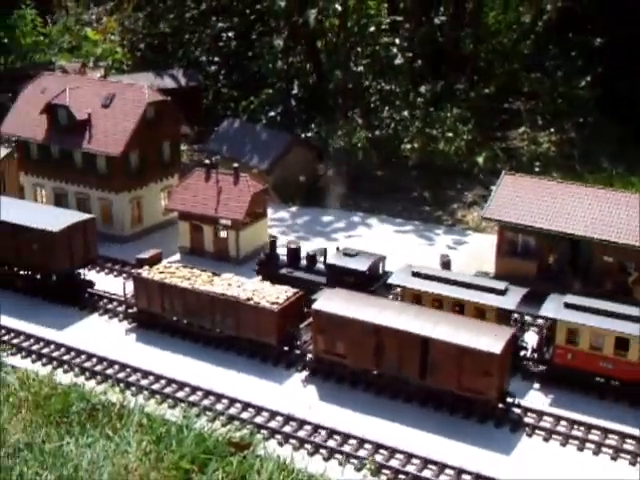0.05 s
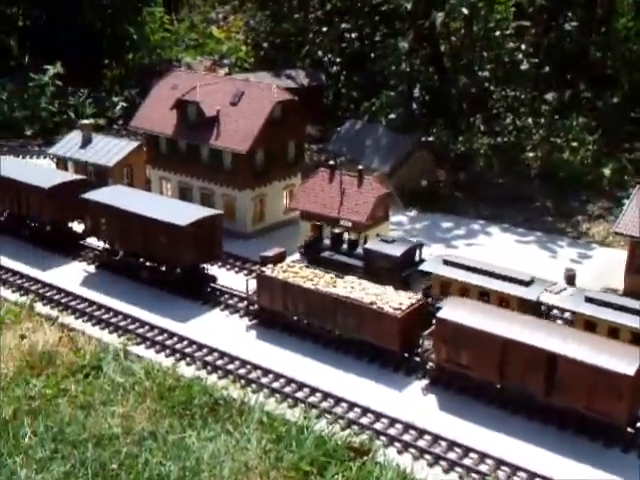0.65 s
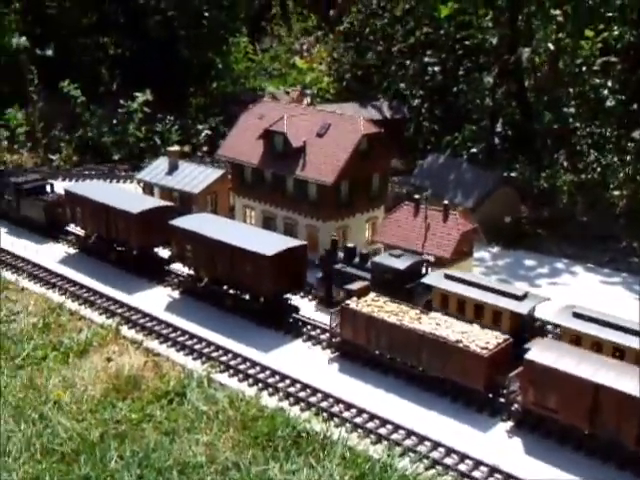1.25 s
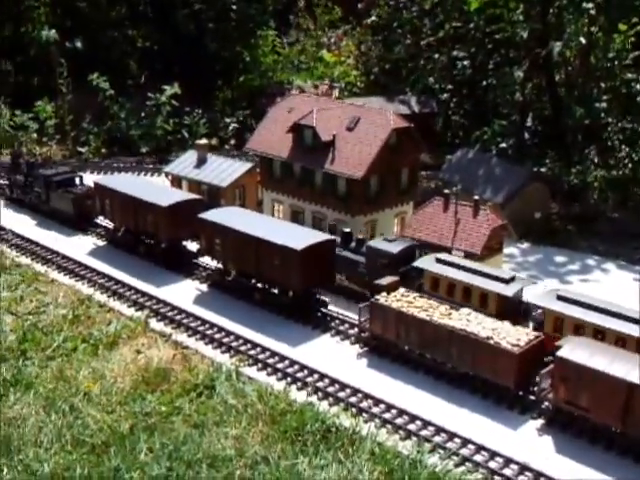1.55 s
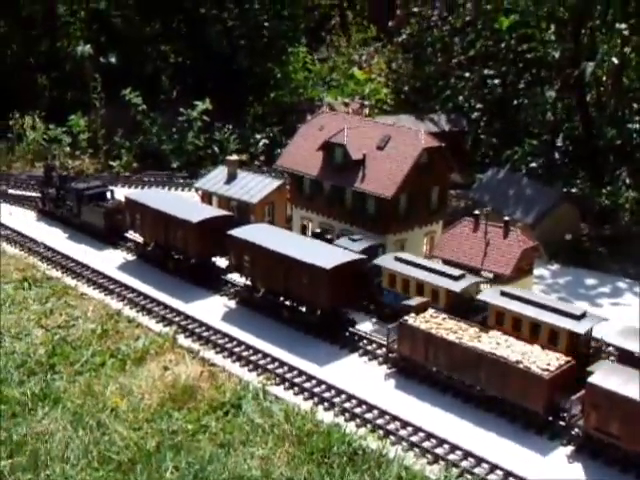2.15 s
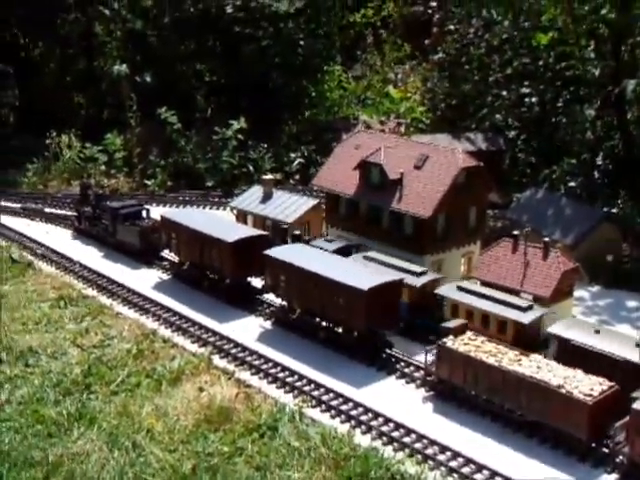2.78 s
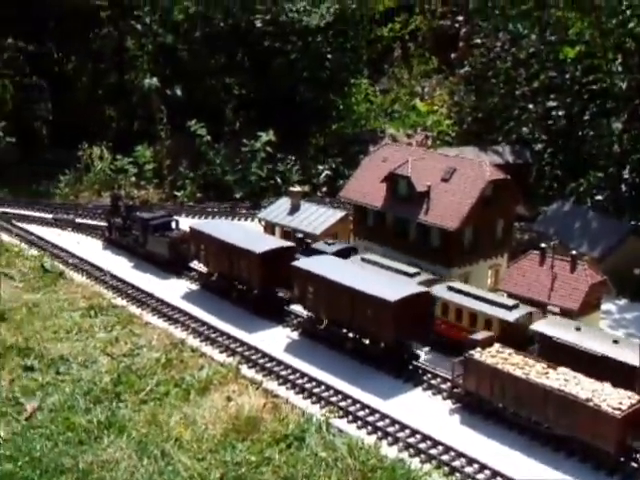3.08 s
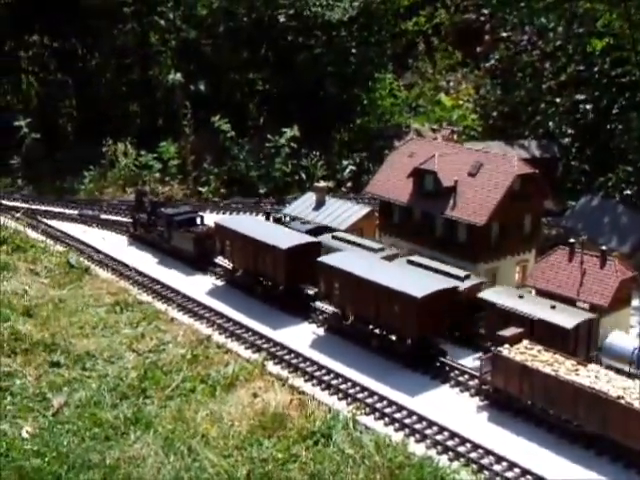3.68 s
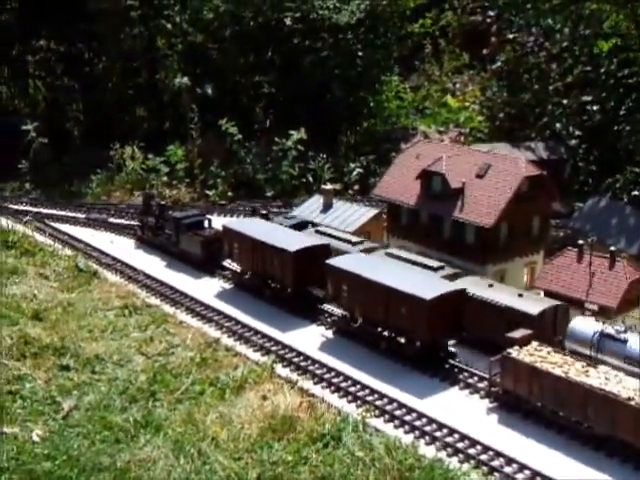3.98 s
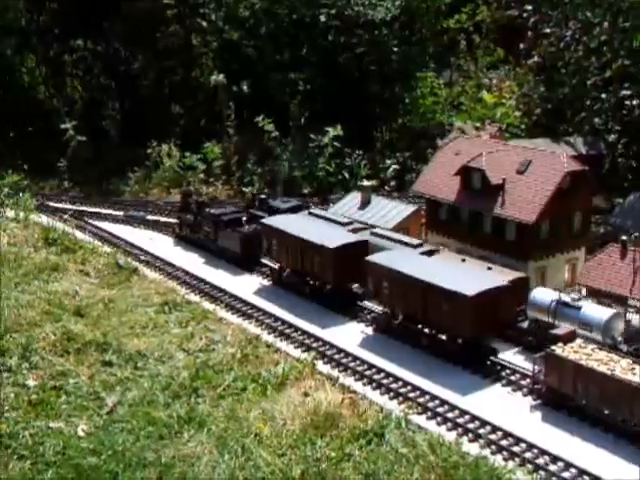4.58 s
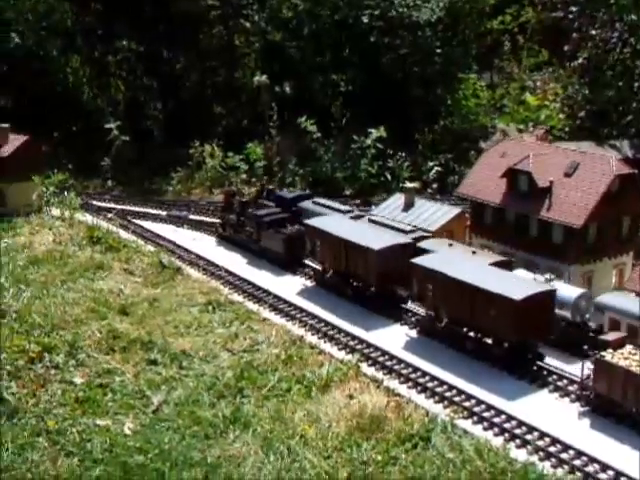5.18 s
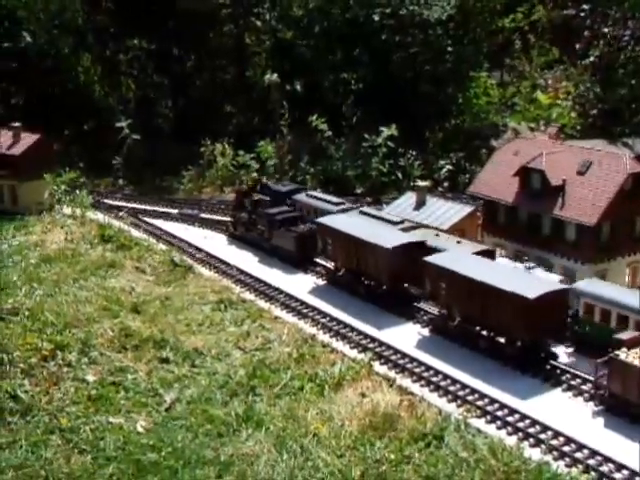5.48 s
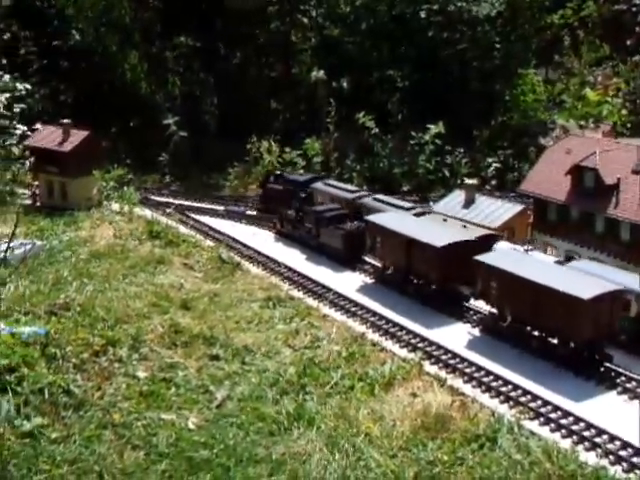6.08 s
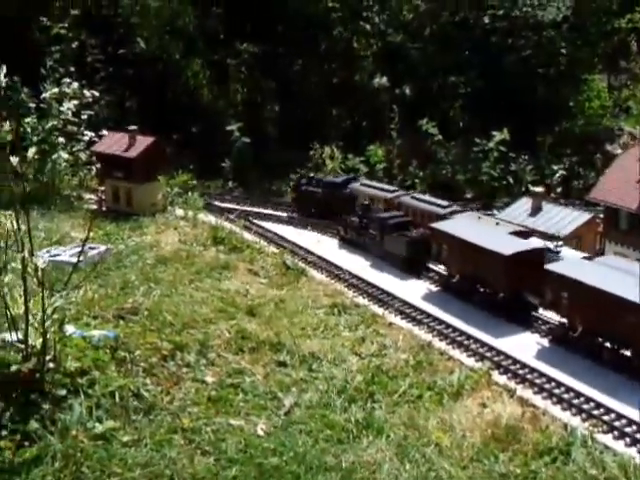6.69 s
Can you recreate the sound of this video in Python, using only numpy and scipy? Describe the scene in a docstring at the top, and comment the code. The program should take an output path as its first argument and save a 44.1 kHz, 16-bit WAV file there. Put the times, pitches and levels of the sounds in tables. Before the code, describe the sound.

Birds chirp briefly as a miniature steam train puffs and rolls away, sounding a piercing, sputtering whistle once long and twice short.

```python
"""Songbirds chirp in the hedge over the chuffing of a small live-steam garden locomotive.
Each piston stroke puffs wet steam up the chimney, and the wagons rumble and clack as they draw away.
The whistle spits water, then a steam jet sounds its pipe: one long, fluttering blast and a double toot
echo round the garden. Automatic gain control ducks everything else under the whistle."""
import sys
import numpy as np
from scipy import signal
from scipy.fft import rfft, irfft, next_fast_len
from scipy.io import wavfile
from scipy.ndimage import uniform_filter1d, minimum_filter1d, map_coordinates

SR = 44100
rng = np.random.default_rng(int(sys.argv[2]) if len(sys.argv) > 2 else 0)


def wav_out(sig):
    """Save sig, one row per channel (or a flat mono array), as 16-bit PCM at SR to the path in sys.argv[1]."""
    wavfile.write(sys.argv[1], SR, np.round(np.clip(np.atleast_2d(sig).T, -1, 1) * 32767).astype(np.int16))


N = 301644
TIME = np.arange(N) / SR

# Levels are relative; a spread is the standard deviation of a bell-shaped swell.
# distant outdoor bed: f/Hz, level/dB
FAR_SPECTRUM = [(50, -17.5), (110, -7.5), (190, -2), (300, -9), (500, -14.5), (1500, -15), (4000, -37.5)]
# low rumble of air: f/Hz, level/dB
AIR_SPECTRUM = [(15, 15.5), (30, -9.5), (65, 0), (110, -11.5), (300, -28), (1500, -81)]
# one puff of air on the microphone: t/s, level/dB, spread/s
GUST = (2.38, -34.5, 0.031)
# garden reverb: f/Hz, time to fall 60 dB/s
GARDEN_DECAY = [(300, 0.44), (2000, 0.8), (5000, 0.54), (9000, 0.27)]
# birdsong: t/s, length/s, start f/Hz, end f/Hz, level/dB, opening trill/share of pitch
BIRD_NOTES = [(-.03, 0.056, 3450, 3450, -33.5, 0.028), (-.02, 0.089, 1677, 1622, -47, 0.017),
              (0.043, .032, 4900, 4350, -30, 0), (0.069, 0.087, 3400, 2862, -24.5, 0.095),
              (.09, 0.075, 1770, 1868, -39.5, 0.1), (.235, 0.057, 1913, 1822, -35, 0),
              (0.275, 0.077, 3490, 3187, -21.5, 0.014), (0.382, 0.039, 2634, 2750, -27, 0.015),
              (.4, 0.063, 1867, 1825, -37.5, 0), (.408, 0.044, 2680, 2534, -27.5, 0.06),
              (1.923, 0.075, 1970, 2017, -55, 0.034), (2.105, 0.048, 2388, 2413, -46.5, 0),
              (6.193, 0.068, 2890, 3110, -43, 0.09), (6.308, 0.065, 4600, 5450, -51.5, .03),
              (6.548, 0.034, 5050, 4580, -41.5, 0), (6.583, 0.06, 3080, 3020, -48, 0.044),
              (6.783, 0.033, 5030, 6100, -40, 0.018)]
# the train draws away: t/s, rolling level/dB, leak level/dB, exhaust level/dB
TRAIN_FADES = [(0.2, -35.5, -43, -29), (1.0, -38.5, -44, -30), (1.5, -36.5, -44.5, -30),
               (2.5, -38.5, -45, -29), (3.4, -38, -45, -34), (4.9, -48, -51.5, -46),
               (5.2, -42.5, -51, -41.5), (6.0, -48, -53, -46.5), (6.8, -45, -50.5, -39.5)]
# wheels on rails: f/Hz, level/dB
ROLLING_SPECTRUM = [(65, -50.5), (110, -27.5), (237, -5.5), (301, -6), (538, -6.5), (790, 3.5), (1040, -23),
                    (1240, -5), (1430, -17), (1790, -9), (2600, -15.5), (3380, -40.5), (5720, -120)]
# wagon bodies and track: f/Hz, width/Hz, level/dB
WAGON_MODES = [(812, 79, 2), (1276, 70, -5), (1870, 320, -15)]
# leaking steam: f/Hz, level/dB
LEAK_SPECTRUM = [(1500, -19.5), (2800, -10), (3700, -3.5), (5000, -2), (5800, -7), (6800, -6.5),
                 (7400, -5.5), (7900, -8)]
# couplings snap taut: t/s, level/dB, spread/s
CLACKS = [(0.527, -36, 0.012), (0.619, -21, 0.0026)]
# colour of a clack: f/Hz, level/dB
COUPLING_SPECTRUM = [(300, -32), (800, -14), (1150, -2), (1700, -5), (2200, 1), (2800, -15), (3500, -11.5),
                     (4500, -15), (8000, -41)]
# flanges touch the rail: t/s, level/dB, spread/s
SCRAPES = [(.524, -32.5, 0.0082), (.965, -37.5, 0.024), (1.455, -38, 0.028)]
# colour of a scrape: f/Hz, level/dB
FLANGE_SPECTRUM = [(1500, -21), (2400, -9), (3300, -5), (4300, 3), (5500, -12), (8000, -17)]
# the driving wheels run evenly, quicken a little, then slow: t/s, rotation/turns
WHEEL_TURNS = [(-.016, 0), (2.405, 7), (2.745, 8), (3.397, 10), (5.006, 15), (5.689, 17), (6.05, 18),
               (6.483, 19), (6.968, 20)]
# four uneven exhaust beats to a wheel turn: position/turns, level/dB
BEATS = [(0, -3), (.253, -2.5), (.473, 0.5), (.693, -2)]
# water spat from the chimney: t/s, level/dB
CHIMNEY_DROPS = [(0.833, -27), (1.178, -27), (2.222, -33)]
# smokebox and chimney: f/Hz, width/Hz, level/dB
CHIMNEY_MODES = [(3370, 580, -14.5), (4034, 110, -3.5), (4490, 160, -0.5), (4846, 120, -3),
                 (5160, 390, -11.5), (5935, 120, -9), (6340, 180, -12.5), (7380, 150, -14.5)]
# spurts of water as the whistle valve first opens: t/s, level/dB, spread/s
SPURTS = [(3.514, -21, 0.0072), (3.529, -17.5, .005), (3.541, -10, 0.005), (3.557, -14, 0.0057)]
# the water-filled whistle: f/Hz, width/Hz, level/dB
FLOODED_MODES = [(1380, 240, -8), (1840, 270, -3), (4155, 680, 0), (4720, 410, 8), (5600, 520, -5.5),
                 (5830, 590, -11), (7590, 170, 1)]
# the pipe empties after the long blast: t/s, level/dB, spread/s
GULP = (4.682, -26.5, 0.008)
# the cab rings under a wet jet: f/Hz, width/Hz, level/dB
CAB_MODES = [(1577, 200, -5), (1790, 190, 1), (2050, 170, -11.5)]
# the pipe, stirred by steam at its lip: f/Hz, width/Hz, level/dB
PIPE_MODES = [(1530, 700, -17.5), (2550, 250, -13), (3540, 930, -9), (4510, 260, 3), (4880, 172, 12.5),
              (5520, 930, -3.5), (6240, 230, 0), (7650, 1800, -8)]
# water in the jet: t/s, relative amount
WETNESS = [(3.6, 0.81), (3.9, 0.91), (4.1, 1.67), (4.45, 1.7), (4.6, .9), (5.38, 0.95), (5.65, 0.55)]
# drops choke the tone: t/s, spread/s, depth/dB
CHOKES = [(3.656, .016, 6), (3.691, 0.0032, 21.5), (3.91, 0.0022, 22), (4.006, 0.0064, 9.5),
          (4.019, .006, 13.5), (4.062, 0.0084, 10), (4.411, 0.01, 7.5), (5.351, 0.021, 7),
          (5.379, 0.0051, 12.5)]
# whistle cues: open t/s, close t/s, f/Hz, scoop/Hz, scoop time/s,
# opening level/dB, closing level/dB, steam rush level/dB
BLASTS = [(3.558, 4.676, 4940, 202, 0.01837, 10, -2.5, -17),
          (5.275, 5.467, 4940, 300, 0.0087, 1.5, -2, -16.5),
          (5.606, 5.741, 4958, 1001, 0.0013, 1.5, -2, -18)]
# steep high cut on the mix: f/Hz, level/dB
HIGH_CUT = [(7650, 0), (7950, -9), (8250, -28), (8400, -50), (8700, -120)]


def amp(db):
    """Decibels to gain."""
    return 10 ** (np.asarray(db) / 20)


def unit(x):
    """x at rms 1."""
    return x / np.sqrt(np.mean(x ** 2) + 1e-20)


def along(points, hz):
    """Points (f/Hz, value) read on a log axis."""
    f, v = np.transpose(points)
    return np.interp(np.log(hz + 1), np.log(f + 1), v)


def curves(rows):
    """An automation curve for each column after the time."""
    times, *columns = np.transpose(rows)
    return [np.interp(TIME, times, column) for column in columns]


def wobble(rate):
    """A smooth random curve, rate knots a second."""
    return map_coordinates(rng.standard_normal(int(N * rate / SR) + 4), [TIME * rate])


def bump(s, spread):
    """A bell-shaped swell of height 1 around time s."""
    return np.exp(-.5 * np.minimum(((TIME - s) / spread) ** 2, 200))


def bursts(rows):
    """Summed swells from rows of t/s, level/dB, spread/s."""
    return sum(amp(db) * bump(s, spread) for s, db, spread in rows)


def gate(t, start, end, edge):
    """1 between start and end, with soft edges."""
    return np.sin(np.pi / 2 * np.clip(np.minimum(t - start, end - t) / edge, 0, 1)) ** 2


def filtered(x, response):
    """x shaped by a frequency response."""
    size = next_fast_len(N + SR // 2)
    return irfft(rfft(x, size) * response(np.fft.rfftfreq(size, 1 / SR)), size)[:N]


def noise(spectrum):
    """Noise of rms 1 with the given colour."""
    return unit(filtered(rng.standard_normal(N), lambda hz: amp(along(spectrum, hz))))


def ring(x, modes):
    """x through a bank of resonances of alternating polarity, at rms 1."""
    def body(f):
        return sum((-1) ** k * amp(db) * 1j * f * width / (hz * hz - f * f + 1j * f * width)
                   for k, (hz, width, db) in enumerate(modes))
    return unit(filtered(x, body))


def resonant(modes):
    """Noise of rms 1 ringing in the given resonances."""
    return ring(rng.standard_normal(N), modes)


def outdoors(far_db=-54.0, breeze_db=-54.5):
    """A low, distant bed, and light air on the microphone with one gust."""
    bed = amp(far_db) * noise(FAR_SPECTRUM) * amp(wobble(1))
    return bed + (amp(breeze_db) + bursts([GUST])) * noise(AIR_SPECTRUM)


def garden_echo(x, predelay_s=.035):
    """Hedge, trees and walls scatter the sound into a short, diffuse tail."""
    hz, t, spectra = signal.stft(rng.standard_normal(SR), SR, nperseg=256)
    decay = amp(-60 * t / along(GARDEN_DECAY, hz)[:, None])
    tail = signal.istft(spectra * decay, SR, nperseg=256)[1]
    delayed = np.pad(x, (int(predelay_s * SR), 0))
    return signal.fftconvolve(delayed, tail / np.linalg.norm(tail))[:N]


def birds(glide_s=0.01436, trill_hz=72, trill_s=0.023, swell_db=9.5, swell_s=.016):
    """Each note is a pure, warbling glide that opens with a trill and swells as it settles."""
    direct, send = np.zeros(N), np.zeros(N)
    warble = 1 + 0.0047 * wobble(140)
    for s, length, start_hz, end_hz, db, trill in BIRD_NOTES:
        on = (TIME > s) & (TIME < s + length)
        t = TIME[on] - s
        hz = (end_hz + (start_hz - end_hz) * np.exp(-t / glide_s)) * warble[on]
        hz *= 1 + trill * np.exp(-t / trill_s) * np.sin(2 * np.pi * trill_hz * t)
        envelope = amp(db + 4.5 - swell_db * np.exp(-t / swell_s)) * gate(t, 0, length, 0.0072)
        note = envelope * np.sin(2 * np.pi * np.cumsum(hz) / SR)
        # fainter and lower notes carry more echo
        send_db = -13.5 - 0.5 * (db + 27) - 2.5 * np.log2(end_hz / 3080)
        direct[on] += note
        send[on] += amp(send_db) * note
    return direct + garden_echo(send)


def wheels():
    """Rolling wheels rumble into the wagon bodies and track."""
    roll_db, _, _ = curves(TRAIN_FADES)
    rumble = amp(-3.5) * noise(ROLLING_SPECTRUM) + amp(-9) * resonant(WAGON_MODES)
    return rumble * amp(roll_db + 0.97 * wobble(20))


def steam_leak():
    """Escaping steam lays a wavering hiss under the chuffs."""
    _, leak_db, _ = curves(TRAIN_FADES)
    return noise(LEAK_SPECTRUM) * amp(leak_db + 5.5 + 1.2 * wobble(9.8))


def wagon_clatter():
    """Couplings clack as the slack runs out, and wheel flanges scrape the rail."""
    return noise(COUPLING_SPECTRUM) * bursts(CLACKS) + noise(FLANGE_SPECTRUM) * bursts(SCRAPES)


def chuff_cues(scatter_db=1.05):
    """The turning wheels time every exhaust beat: t/s, level/dB."""
    times, turns = np.transpose(WHEEL_TURNS)
    fade_s, _, _, exhaust_db = np.transpose(TRAIN_FADES)
    for turn in range(int(turns[-1])):
        for position, db in BEATS:
            s = np.interp(turn + position, turns, times)
            yield s, db + np.interp(s, fade_s, exhaust_db) - scatter_db * rng.standard_normal()


def exhaust(skirt_s=0.015, skirt_db=-10, sputter_db=2.0):
    """Every piston stroke puffs wet steam up the chimney; a harder beat has a tighter core."""
    beats = np.zeros(N)
    for s, db in chuff_cues():
        core = bump(s, 0.0069 * amp(-.3 * (db + 30)))
        beats += amp(db) * (core + amp(skirt_db) * bump(s, skirt_s))
    drops = sum(amp(db) * (TIME > s) * np.exp(-np.abs(TIME - s) / 0.0013) for s, db in CHIMNEY_DROPS)
    sputter = unit(amp(sputter_db * wobble(500)))
    return (amp(-3.5) * beats * sputter + drops) * resonant(CHIMNEY_MODES)


def whistle_spit(drops_per_s=3500):
    """Condensed water crackles out of the cold whistle, and the pipe gulps as it empties."""
    drops = (rng.random(N) < drops_per_s / SR) * rng.standard_normal(N)
    crackle = bursts(SPURTS) * (ring(drops, FLOODED_MODES) + amp(-7.5) * resonant(PIPE_MODES))
    return crackle + bursts([GULP]) * resonant(CAB_MODES)


def whistle(sag_hz=210, sag_s=0.009, bleed_s=0.015, close_s=0.0044):
    """A steam jet sounds a short pipe; pitch scoops up and sags with the pressure, water adds rasp."""
    choke_db = sum(depth * bump(s, spread) for s, spread, depth in CHOKES)
    wetness, = curves(WETNESS)
    excess_water = wetness - 1
    # water makes the tone flutter, weakens it and pushes it sharp
    flutter_db = 2 * wetness * unit(wobble(170) + .5 * wobble(75))
    tone_gain = amp(flutter_db - choke_db - 2 * excess_water)
    jitter_hz = wetness * (19 * wobble(260) + 9 * wobble(35))
    sharpen_hz = 32.36 * excess_water + 4.5 * choke_db
    # a wetter jet also rushes louder and rings the cab harder
    rush = resonant(PIPE_MODES) * amp(5 * (wetness - 2))
    cab = resonant(CAB_MODES) * amp(-38.5 + 9.5 * excess_water)
    out = np.zeros(N)
    for start, end, hz, scoop_hz, scoop_s, open_db, close_db, rush_db in BLASTS:
        remaining = np.maximum(end - TIME, 0)
        scoop = scoop_hz * np.exp(-np.maximum(TIME - start, 0) / scoop_s)
        sag = sag_hz * np.exp(-remaining / sag_s)
        pitch = hz + sharpen_hz + jitter_hz - scoop - sag
        envelope = gate(TIME, start, end, 0.0033) * (1 - np.exp(-remaining / close_s))
        tone = tone_gain * envelope * np.sin(2 * np.pi * np.cumsum(pitch) / SR)
        # steam flows just before the pipe speaks and bleeds away as the valve shuts
        flow = np.exp(-np.maximum(start - TIME, 0) / 0.0054)
        flow *= np.exp(-np.maximum(TIME - end + bleed_s, 0) / bleed_s)
        pressure = amp(np.interp(TIME, [start, end], [open_db, close_db]))
        out += pressure * (tone + flow * (amp(rush_db) * rush + cab))
    return out


def scene(echo_db=-17.5):
    """Mono mix: the whistle and its echo on top of train, birds and outdoor bed."""
    blasts = whistle() + whistle_spit()
    train = wheels() + steam_leak() + exhaust() + wagon_clatter()
    return (train + blasts + amp(echo_db) * garden_echo(blasts) + birds() + outdoors())[None]


def gain_control(x, threshold_db=-10.0, hold_s=0.043, release_db_per_s=130):
    """The gain ducks within milliseconds on a loud sound, holds, then climbs back."""
    power = np.abs(uniform_filter1d(x ** 2, size=176, origin=44))
    over_db = np.maximum(10 * np.log10(power + 1e-12) - threshold_db, 0)
    span = int(hold_s * SR)
    held_db = -minimum_filter1d(-over_db, span, origin=(span - 1) // 2)
    release_db = release_db_per_s * TIME
    cut_db = np.maximum.accumulate(held_db + release_db) - release_db
    return x * amp(-uniform_filter1d(cut_db, size=132))


def record(dry, clip_level=.66, floor_db=-51.5):
    """Output chain: ducking, a soft clip on stray peaks, a faint low noise floor and a high cut."""
    ducked = gain_control(dry[0])
    rounded = ducked / (1 + (ducked / clip_level) ** 8) ** (1 / 8)
    noisy = rounded + amp(floor_db) * noise(AIR_SPECTRUM)
    return filtered(noisy, lambda hz: amp(along(HIGH_CUT, hz)))[None]


dry = scene()
out = record(dry)
wav_out(out)
```